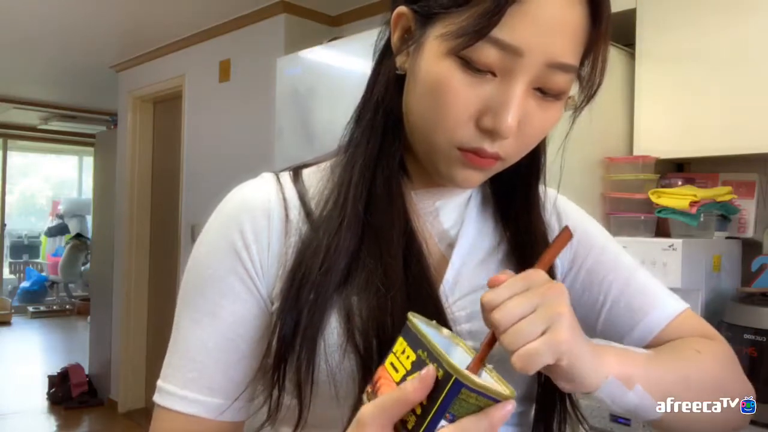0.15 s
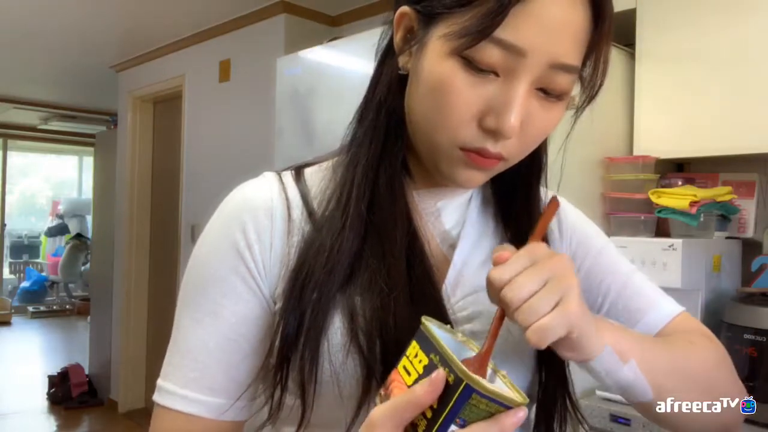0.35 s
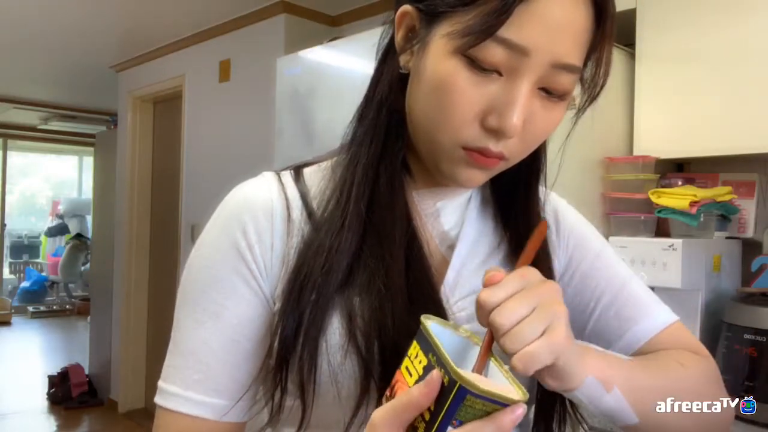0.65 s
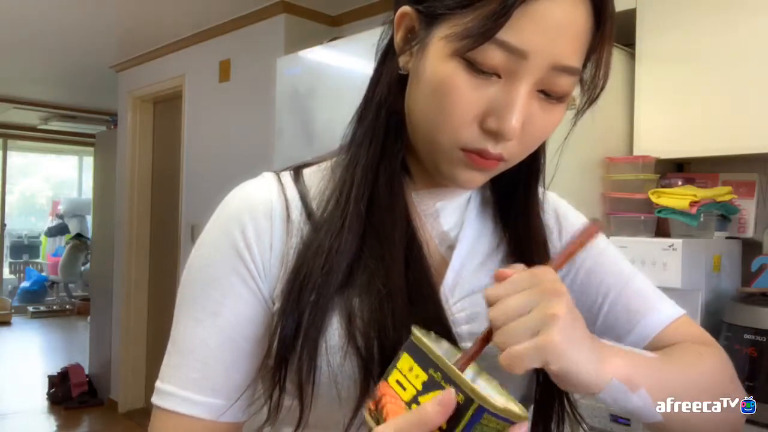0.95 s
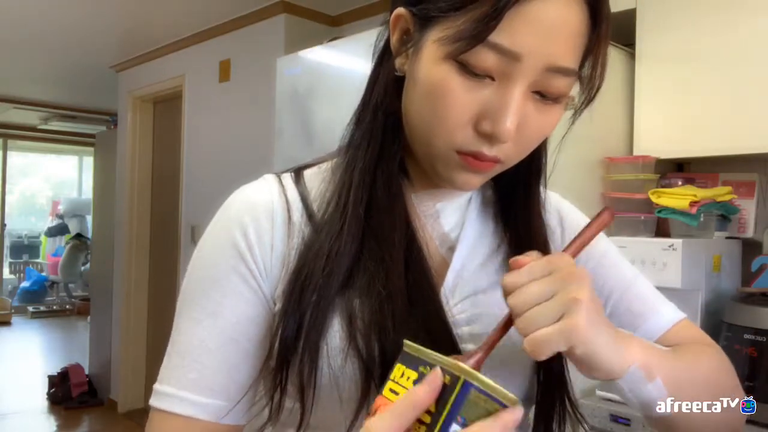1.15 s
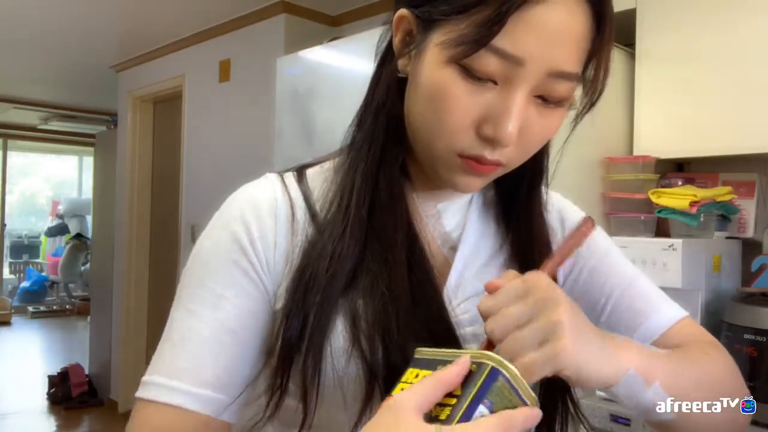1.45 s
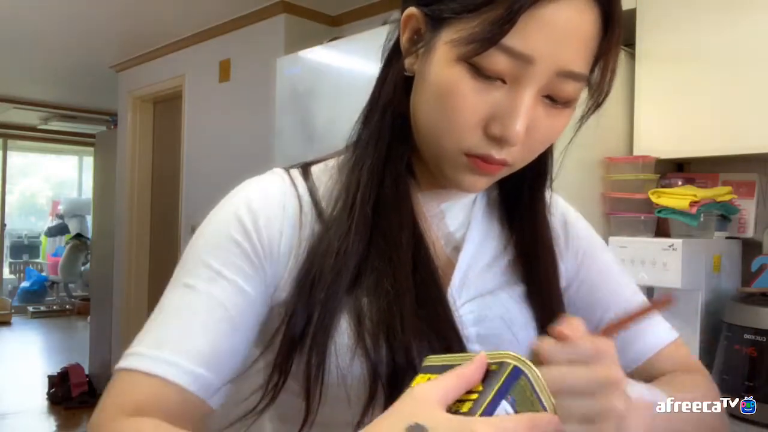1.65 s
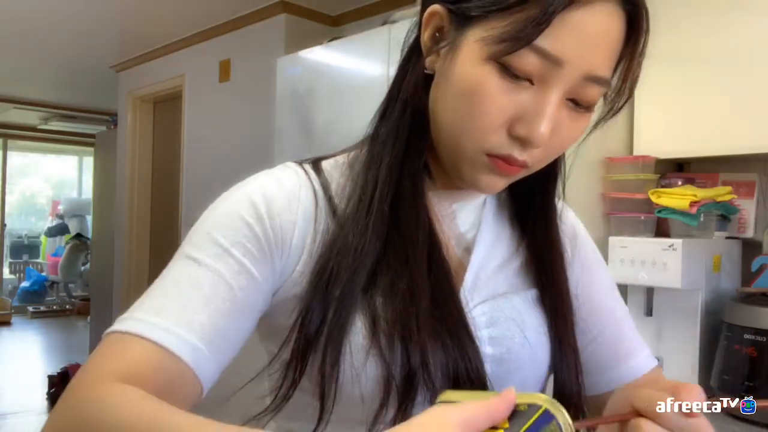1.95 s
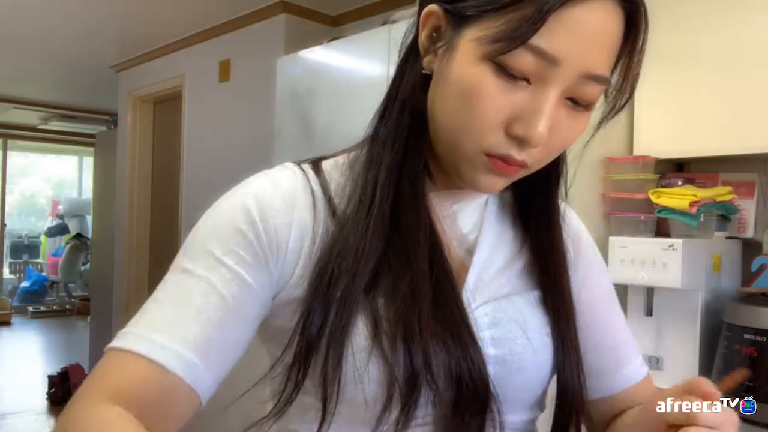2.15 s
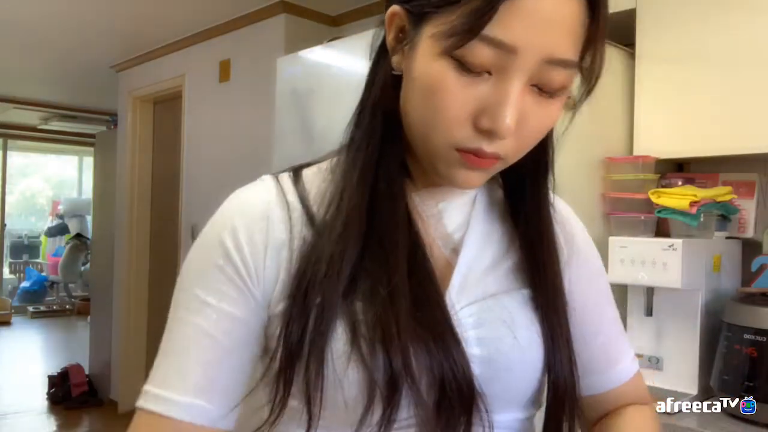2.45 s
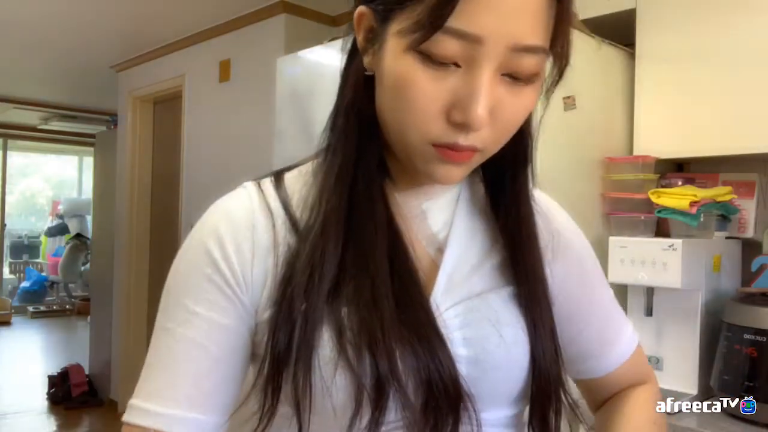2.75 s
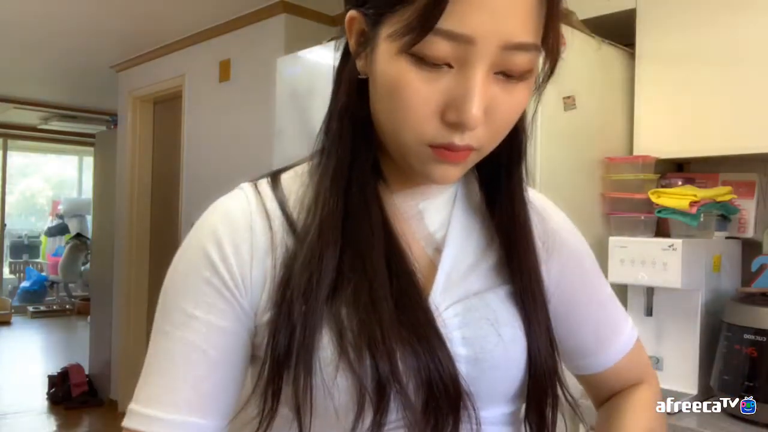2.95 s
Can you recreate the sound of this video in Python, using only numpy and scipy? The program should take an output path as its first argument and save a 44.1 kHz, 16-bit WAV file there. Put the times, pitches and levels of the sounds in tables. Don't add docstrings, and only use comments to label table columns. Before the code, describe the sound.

Close, slightly dull pickup in a small hard kitchen: muffled tinny taps in uneven clusters over low appliance hum, a quiet gap, then a louder set-down with wooden thumps, handle chatter and ringing cutlery.

```python
import sys
import numpy as np
from scipy import signal
from scipy.fft import rfft, irfft
from scipy.io import wavfile
from scipy.ndimage import uniform_filter1d

SR = 44100
rng = np.random.default_rng(int(sys.argv[2]) if len(sys.argv) > 2 else 0)


def gain_from_decibels(decibels):
    exponent = np.asarray(decibels, float) / 20
    return 10 ** exponent


def waveform_to_disk(signal):
    frames = np.transpose(np.atleast_2d(signal))
    scaled = np.clip(frames, -1, 1) * 32767
    samples = np.round(scaled).astype(np.int16)
    wavfile.write(sys.argv[1], SR, samples)


N = 136710
BLOW_SIZE = SR // 2
SLIP_SIZE = 4096


def unit(x):
    return x / np.sqrt(np.mean(x ** 2) + 1e-18)


def noise(size):
    return rng.standard_normal(size)


def colour(x, points):
    hz = np.maximum(np.fft.rfftfreq(len(x), 1 / SR), 1)
    points_hz, points_db = np.array(points, float).T
    gain = gain_from_decibels(np.interp(np.log(hz), np.log(points_hz), points_db))
    return irfft(rfft(x) * gain, len(x))


def walk(rate_hz):
    hold = int(SR / rate_hz)
    steps = np.repeat(noise(N // hold + 1), hold)
    smooth = uniform_filter1d(uniform_filter1d(steps, hold), hold)
    return unit(smooth[:N])


def fade(t, t60_s):
    return gain_from_decibels(-60 * t / t60_s)


def onset(x, rise_s):
    t = np.arange(len(x)) / SR
    return x * (1 - np.exp(-t / rise_s)) ** 2


def add(out, start_s, x):
    i = int(start_s * SR)
    out[i:i + len(x)] += x[:N - i]


def ring(modes_hz, modes, stretch=1, tilt_db=0, scatter_db=1.5, detune=.005, size=BLOW_SIZE):
    t = np.arange(size) / SR
    chance = noise((len(modes), 2))
    rows = []
    for hz, (db, t60_s), (level_chance, pitch_chance) in zip(modes_hz, modes, chance):
        level_db = db + tilt_db * np.log2(hz / 500) + scatter_db * level_chance
        tone = np.sin(2 * np.pi * hz * (1 + detune * pitch_chance) * t)
        rows.append(gain_from_decibels(level_db) * fade(t, t60_s * stretch) * tone)
    return np.array(rows)


def crack(points):
    t = np.arange(BLOW_SIZE) / SR
    burst_t60_s, rattle_t60_s, rattle_db = 0.039, 0.14, -6.5
    decay = fade(t, burst_t60_s) + gain_from_decibels(rattle_db) * fade(t, rattle_t60_s)
    return unit(colour(noise(BLOW_SIZE), points)) * decay


def convolve(x, response):
    return signal.fftconvolve(x, response / np.linalg.norm(response))[:N]


def rub(strokes, per_s, spread_db, body, points, release):
    attack_s, biggest_slip = 0.0035, .05
    t = np.arange(N) / SR
    push, grit = np.zeros(N), np.zeros(N)
    for start_s, length_s, db, grit_db in strokes:
        rise = (t - start_s) / attack_s
        fall = (start_s + length_s - t) / (release * length_s)
        shape = gain_from_decibels(db) * np.clip(np.minimum(rise, fall), 0, 1)
        push += shape
        grit += shape * gain_from_decibels(grit_db)
    occurs, size, sign = rng.random((N, 3)).T
    slip_level = gain_from_decibels(-spread_db * np.log(np.maximum(size, biggest_slip)))
    slips = (occurs < per_s / SR) * slip_level * np.sign(sign - .5) * np.sqrt(SR / per_s)
    tick = colour((np.arange(2048) == 96) * 1., points)
    return convolve(slips * push, body) + convolve(slips * grit, tick)


def kitchen():
    # pitch_hz, level_db
    rumble = [(12, -47.5), (20, -14.5), (128, -5.5), (180, -6.5), (199, -18.5), (352, -21.5), (869, -30.5),
              (1620, -34.5), (9600, -64.5), (12500, -103.5), (21100, -120)]
    # pitch_hz, width_hz, over_hum_db
    resonances = [(50, 6.9, 6), (97, 7.9, 5), (125, 11, 3), (179, 8, 9.5), (212.6, 12, 14),
                  (343.3, 7.8, 12), (507, 55, 6)]
    # time_s, level_db
    rustle_levels = [
        (0.0, -49),
        (0.03, -54.5),
        (0.16, -56),
        (0.29, -66.5),
        (1.01, -66),
        (1.13, -69.5),
        (1.94, -78),
        (2.18, -70),
        (2.61, -67.5),
        (2.72, -67),
    ]
    hum_db, rustle_db = -41, -1.5

    hz = np.fft.rfftfreq(N, 1 / SR)
    boost_db = sum(db / (1 + ((hz - f) / width * 2) ** 2) for f, width, db in resonances)
    hum = unit(irfft(rfft(colour(noise(N), rumble)) * gain_from_decibels(boost_db), N))
    hum = hum * gain_from_decibels(hum_db + walk(2.7))

    rustle = unit(colour(noise(N), [(300, -23.5), (900, -12), (9000, -21.775)]))
    time_s, level_db = np.array(rustle_levels).T
    motion_db = np.interp(np.arange(N) / SR, time_s, level_db)
    return hum + rustle * gain_from_decibels(rustle_db + motion_db + 0.85 * walk(25.79))


def spoon():
    # start_s, level_db, crack_re_level_db, free_ring_stretch, rise_ms
    taps = [(0.0918, -17.5, -9.5, 0.89, 1.6), (.358, -41.5, -21, 0.93, 1.6), (0.4874, -20, -15, 1.07, 1.07),
            (0.506, -31, -10, 1.3, 1.2), (.524, -23, -27, 0.83, 0.84), (.627, -51, -0.5, 2.6, 2.2),
            (.888, -28.5, -4.5, 0.64, 2.1), (.899, -24.5, -7, .7, 1.5), (.911, -28.5, -5.5, 1.2, 1.1),
            (.921, -18, -18, 1.9, 1), (1.087, -22, -29, 1.52, 1.45), (1.293, -36, -32, 1.1, 1.05),
            (1.389, -35, -24, 1.7, 0.84), (1.447, -32.5, -27.5, 1.05, 1.6), (1.578, -47, -13, 0.69, 3.3)]
    tin_hz = [673, 834, 969, 1040, 1110, 1400, 1650, 1841]
    # level_db, t60_s
    tin = [(-12, 0.072), (-7, 0.056), (4, 0.084), (-5, 0.078), (-15.5, 0.019), (-20.5, 0.047),
           (-16.5, .025), (-16.5, 0.04)]
    # start_s, length_s, level_db, grit_re_level_db
    scrapes = [
        (.63, 0.12, -51.5, -16.5),
        (.88, 0.0072, -50.5, 8),
        (.884, 0.072, -33, -2.5),
        (1.38, 0.14, -55, -10.5),
        (1.57, 0.035, -75.5, 2),
    ]
    # pitch_hz, level_db
    contact = [(300, -49.5), (600, -13), (1000, -6), (1400, -17), (3140, -19), (7460, -25), (9600, -40.5)]
    # pitch_hz, level_db
    grit = [(300, -20), (1200, 4), (2600, 1), (4000, -8.5), (7300, -16), (9600, -27)]

    slip_ring = ring(tin_hz, tin, 0.43, size=SLIP_SIZE).sum(0)
    out = rub(scrapes, 1800, 3, slip_ring, grit, 0.47)
    t = np.arange(BLOW_SIZE) / SR
    grip_s, grip_db = .013, -14
    for start_s, db, crack_db, stretch, rise_ms in taps:
        closing_s = [0.58 * grip_s * stretch, 1.52 * grip_s * stretch]
        grip = gain_from_decibels(np.interp(t, closing_s, [0, grip_db]))
        body = onset(ring(tin_hz, tin).sum(0), rise_ms / 1000) * grip
        add(out, start_s, gain_from_decibels(db) * (body + gain_from_decibels(crack_db) * crack(contact)))
    return out


def table():
    # start_s, level_db, crack_re_level_db
    set_down = [
        (2.7316, -14.5, -7),
        (2.827, -31, -8.5),
    ]
    base_hz = [108, 479, 740, 1082, 1180, 1270, 1518, 1760, 2150, 2713]
    # level_db, t60_s
    base = [(-14.5, 0.6), (-17, 0.17), (-13, 0.045), (-2.5, 0.088), (-1, 0.054), (-6.5, 0.072),
            (-9.5, 0.086), (-8, 0.04), (-9, 0.039), (-3, 0.03)]
    # start_s, level_db, crack_re_level_db, tilt_db_per_octave, ring_stretch
    knocks = [
        (2.882, -17.5, -28.5, -4, 1.28),
        (2.938, -14, -3.5, -0.5, 0.26),
        (2.941, -10, -9.5, -2.5, 0.52),
        (3.074, -17, -10.5, -3, 0.93),
    ]
    table_hz = [112, 192, 240, 300, 358, 482, 534, 740, 1050, 1260, 1530, 1680, 2430, 2700]
    # level_db, t60_s
    top = [(-6, 0.19), (-2, 0.21), (-4.5, 0.088), (-7, 0.077), (-9, 0.19), (-5, 0.06), (-8, 0.16),
           (-10.5, 0.15), (-8, 0.091), (-13, .08), (-18.5, 0.064), (-8.5, 0.2), (-27, 0.074),
           (-24.5, 0.044)]
    # pitch_hz, level_db
    contact = [(180, -49), (300, -5), (477, -24.5), (890, -26), (1070, -10), (7500, -27.5), (9600, -50.5),
               (12500, -74), (21100, -120)]
    # start_s, length_s, level_db, grit_re_level_db
    chatter = [
        (2.942, .13, -23, 0),
        (2.74, 0.075, -35.5, -4),
    ]
    # pitch_hz, level_db
    clatter = [(90, -26), (250, 5.5), (550, -2), (1200, -6.5), (2600, -14.5), (5000, -35.5), (9600, -40.5)]

    slip_ring = ring(table_hz, top, 0.29, 2.9, size=SLIP_SIZE).sum(0)
    out = rub(chatter, 450, 2.5, slip_ring, clatter, 1.0)
    for start_s, db, crack_db in set_down:
        body = onset(ring(base_hz, base).sum(0), 0.00034)
        add(out, start_s, gain_from_decibels(db) * (body + gain_from_decibels(crack_db) * crack(contact)))
    for start_s, db, crack_db, tilt_db, stretch in knocks:
        body = onset(ring(table_hz, top, stretch, tilt_db).sum(0), 0.0027)
        add(out, start_s, gain_from_decibels(db) * (body + gain_from_decibels(crack_db) * crack(contact)))
    return out


def cutlery():
    # start_s, level_db, crack_re_level_db, damped_after_s
    clinks = [
        (2.8781, -11.5, -2.5, .059),
        (3.0692, -15, 0, .2),
    ]
    steel_hz = [740, 1848, 3319, 5130, 5545, 6094, 6584, 6729, 6930, 6982, 7137, 7181, 7252, 8100]
    # level_db, t60_s
    steel = [(-9, 0.19), (-3, 0.59), (-19, 0.77), (-14, .5), (-38, 0.052), (-29, .06), (-15, 0.088),
             (-13.5, 0.22), (-14, .2), (-7.5, 0.14), (-16, 0.29), (-9, 0.19), (-12.5, .2), (-19, 0.42)]
    # pitch_hz, level_db
    bright = [(400, -18.5), (1600, -7.5), (2400, -22), (3500, -15.5), (5900, -23.5), (7100, -2),
              (7900, -19), (9400, -24.5)]
    flutter_db, flutter_hz, rise_s = 1.6, 90, 0.0055
    damped_db, splash_db, splash_t60_s = -15, -9, .12

    out, t = np.zeros(N), np.arange(BLOW_SIZE) / SR
    for start_s, db, crack_db, free_s in clinks:
        modes = ring(steel_hz, steel, scatter_db=1, detune=0)
        uneven = sum(mode * gain_from_decibels(flutter_db * walk(flutter_hz)[:len(t)]) for mode in modes)
        free = onset(uneven, rise_s)
        damped = gain_from_decibels(damped_db) * colour(free, [(4500, 0), (6500, 7)])
        damping = np.interp(t, [free_s, free_s + .004], [0, 1])
        body = free * (1 - damping) + damped * damping
        splash = gain_from_decibels(splash_db) * unit(colour(noise(len(t)), bright)) * fade(t, splash_t60_s)
        add(out, start_s, gain_from_decibels(db) * (body + gain_from_decibels(crack_db) * (crack(bright) + splash)))
    return out


def room(x):
    t = np.arange(SR // 2) / SR
    low = colour(noise(len(t)), [(1500, 0), (5000, -19)]) * fade(t, 0.42)
    high = colour(noise(len(t)), [(1500, -20), (5000, 1)]) * fade(t, .25)
    wet_db, rise_s = -14, .005
    return gain_from_decibels(wet_db) * convolve(x, onset(low + high, rise_s))


def scene():
    hum = kitchen()
    wood = spoon() + table()
    steel = cutlery()
    steel_wet_db = -2
    echo = room(wood + gain_from_decibels(steel_wet_db) * steel)
    return (wood + steel + echo + hum)[None]


def band_limit(x):
    return signal.sosfilt(signal.butter(12, 9750, fs=SR, output="sos"), x)


def record(dry):
    limit, top_hz = .8, 9600
    rounded = limit * np.tanh(dry / limit)
    lowpass = signal.ellip(8, .2, 70, top_hz, fs=SR, output="sos")
    mix = signal.sosfilt(lowpass, rounded)
    return band_limit(mix)


dry = scene()
out = record(dry)
waveform_to_disk(out)
```